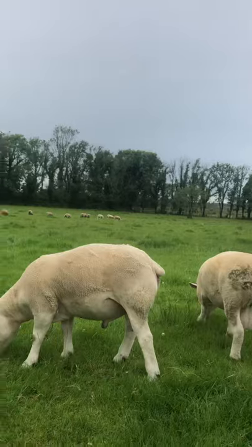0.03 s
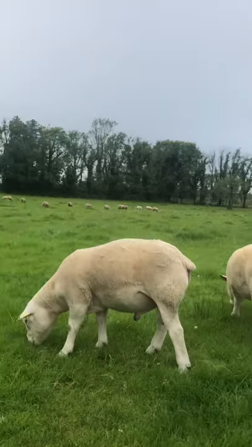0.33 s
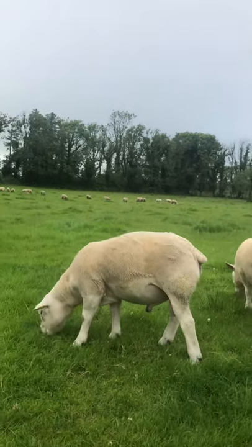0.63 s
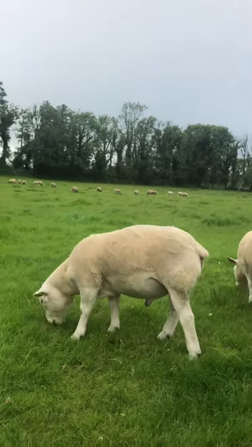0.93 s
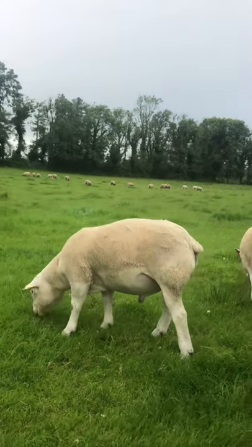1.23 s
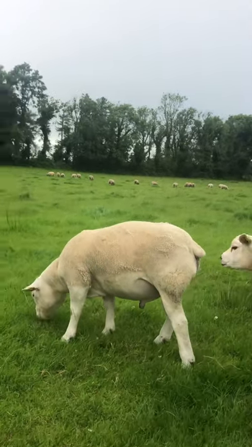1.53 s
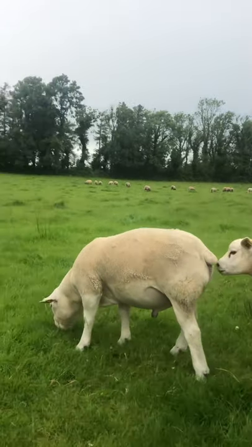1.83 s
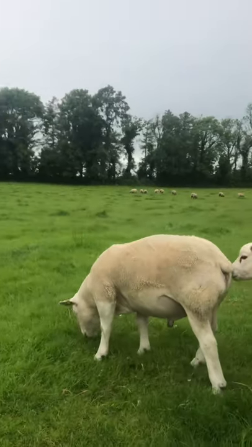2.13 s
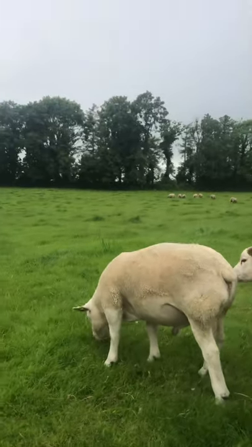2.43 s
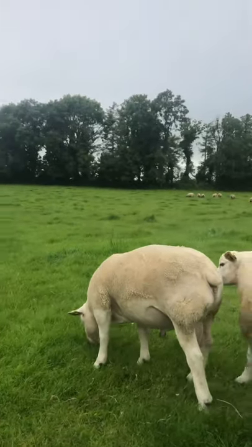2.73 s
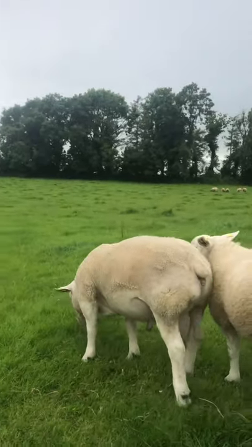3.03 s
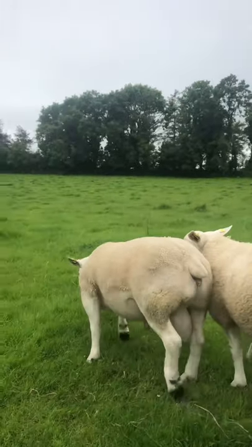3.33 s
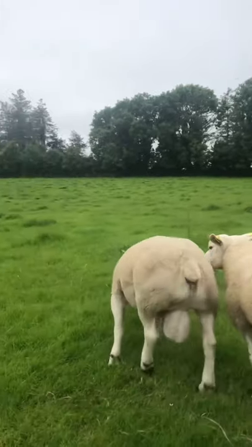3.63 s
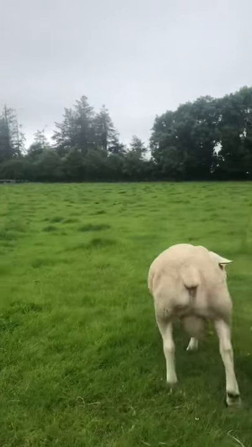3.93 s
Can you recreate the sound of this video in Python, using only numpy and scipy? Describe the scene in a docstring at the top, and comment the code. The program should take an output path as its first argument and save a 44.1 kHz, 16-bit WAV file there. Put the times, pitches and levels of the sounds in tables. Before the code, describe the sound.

Quiet rustling and crisp little snaps come from nearby sheep pulling at long grass in a field. A low wind rumble on the microphone grows into uneven, muffled gusts that are louder than the grazing near the end.

```python
"""Sheep graze a few steps away in an open field. From the start long grass swishes over distant air
and a faint hum, and a light breeze rumbles on the microphone. Stalks snap and tufts tear as the sheep
pull at them; after a second, sliding blades hiss now and then and a few hard little clicks sound.
From about two seconds on the breeze freshens, and its turbulence hits the microphone in short, dull
buffets and tight eddies while the grazing goes on."""
import sys
import numpy as np
from scipy import signal
from scipy.io import wavfile

SR = 44100
rng = np.random.default_rng(int(sys.argv[2]) if len(sys.argv) > 2 else 0)


def inscribe(sig):
    """Save sig as 16-bit PCM at rate SR to the path in sys.argv[1].

    A 1-D sig is mono; a 2-D sig holds one channel per row.
    Samples are clipped to [-1, 1] before scaling.
    """
    pcm = np.round(np.clip(np.atleast_2d(sig).T, -1, 1) * 32767)
    wavfile.write(sys.argv[1], SR, pcm.astype(np.int16))


N = 176400
TIME = np.arange(N) / SR


def from_db(db):
    """Amplitude ratio of a level in decibels."""
    return 10 ** (np.asarray(db) / 20)


def unit_rms(x):
    """Normalisation to a mean square of one."""
    return x / np.sqrt(np.mean(x ** 2) + 1e-20)


def in_time(rows):
    """Linear interpolation of (time, value) rows at every sample."""
    return np.interp(TIME, *np.transpose(rows))


def filtered(x, hz, kind, order=2):
    """Butterworth filter: maximally flat in its passband."""
    sos = signal.butter(order, np.clip(hz, 10, .45 * SR), kind, fs=SR, output="sos")
    return signal.sosfilt(sos, x + 1e-18)


def drift(per_s):
    """Random fluctuation: straight lines between Gaussian values of unit variance."""
    knots = rng.standard_normal(600)
    return np.interp(TIME * per_s, np.arange(len(knots)), knots)


def grains(per_s, spread_db, size):
    """Shot noise: impulses of random time, sign and strength."""
    strength = from_db(spread_db * np.minimum(rng.exponential(1, size), 5))
    return (rng.random(size) < per_s / SR) * strength * rng.choice([-1, 1], size)


def coloured(sources, spectrum, tilt_db=0, patchy_db=0):
    """Spectral shaping in half-octave bands, taken in turn from two sources; unit rms."""
    edges = 30 * 2 ** np.arange(0, 9.6, .5)
    points_hz, levels = np.transpose(spectrum)
    out = 0
    for k, (low, high) in enumerate(zip(edges, edges[1:])):
        if high < points_hz[0]:
            continue
        hz = np.sqrt(low * high)
        db = np.interp(np.log(hz), np.log(points_hz), levels) + tilt_db * np.log2(hz)
        if patchy_db:
            db = db + patchy_db * drift(16)
        out = out + from_db(db) * filtered(sources[k % 2], [low, high], "band")
    return unit_rms(out)


def burst(x, length_s, edge_s):
    """Gating with raised-cosine edges; unit rms over the length."""
    t = TIME[:len(x)]
    ramp = np.clip(np.minimum(t, length_s + edge_s - t) / edge_s, 0, 1)
    x = x * np.sin(np.pi / 2 * ramp) ** 2
    return x / np.sqrt(np.sum(x ** 2) / (length_s * SR) + 1e-20)


def add(out, start_s, x):
    """Superposition of x on out from a given time."""
    i = int(np.clip(start_s * SR, 0, N - 1))
    out[i:i + len(x)] += x[:N - i]


# Spectrum of distant air: (frequency [Hz], relative spectral level [dB])
AIR_SPECTRUM = [(30, 13.5), (70, -2.5), (190, 0.5), (300, -9.5), (500, -2), (1000, -8), (2000, -20),
                (4000, -30), (9000, -42.5), (16000, -58)]
# Envelope of a far hum: (time [s], level [dB])
HUM_LEVEL = [(0, -67.5), (.45, -69), (.65, -63.5), (1.25, -67), (1.6, -88), (4, -68)]


def field():
    """Ambient noise of distant air, with a faint hum broadened by random frequency modulation."""
    air = from_db(-64) * coloured(rng.standard_normal((2, N)), AIR_SPECTRUM)
    hum_hz = 198.6 + 5 * drift(20)
    hum = np.sqrt(2) * np.sin(2 * np.pi * np.cumsum(hum_hz) / SR)
    return air + from_db(in_time(HUM_LEVEL)) * hum


# Spectra of the grass's body and tips: (frequency [Hz], relative spectral level [dB])
BODY_SPECTRUM = [(300, 8), (700, 4.5), (1200, 3), (2200, -1.5), (4000, -1.5), (6000, -4), (9000, -4.5),
                 (16000, -50)]
TIP_SPECTRUM = [(4000, -3.5), (6000, -0.5), (8500, -2), (11500, 10), (16000, -5)]
# Envelopes of the body, the tips and the tips' highest treble: (time [s], relative level [dB])
BODY_LEVEL = [(0, -62.5), (.1, -61), (.25, -64.5), (.47, -66.5), (.52, -57), (.75, -62), (.82, -60),
              (1.05, -57), (1.15, -63), (1.24, -60), (1.58, -66), (1.88, -61), (2.15, -66.5), (2.54, -62.5),
              (2.63, -61.5), (2.72, -63), (2.84, -61), (2.92, -65), (3.3, -63), (3.35, -62), (3.64, -59.5),
              (3.76, -64), (4, -68)]
TIP_LEVEL = [(0, -63.5), (.1, -56), (.2, -58), (.47, -71.5), (.51, -61), (.62, -61.5), (.68, -55),
             (.76, -59.5), (.81, -56.5), (1.17, -62.5), (1.23, -55), (1.29, -62), (1.35, -54.5), (1.4, -68),
             (1.68, -63), (1.95, -60), (2.2, -73), (2.5, -64), (2.63, -63), (2.72, -63.5), (2.87, -62),
             (2.91, -70), (3.09, -74), (3.31, -64.5), (3.34, -54.5), (3.4, -58), (3.66, -59.5), (3.87, -67),
             (3.93, -61.5), (4, -65)]
SHEEN_LEVEL = [(0, -4), (.9, -2.5), (1.7, -4.5), (2.5, -1), (4, -2.5)]


def swish(sheen_hz=11100):
    """Countless blade contacts sum incoherently into a papery body and a fine hiss from the tips."""
    def brushing(spectrum):
        contacts = [grains(per_s=20000, spread_db=3, size=N) for _ in range(2)]
        return coloured(contacts, spectrum, patchy_db=1.62)

    body = from_db(in_time(BODY_LEVEL) + 1.5) * brushing(BODY_SPECTRUM)
    hiss = brushing(TIP_SPECTRUM)
    sheen = from_db(in_time(SHEEN_LEVEL)) * filtered(hiss, sheen_hz, "high", order=5)
    tips = from_db(in_time(TIP_LEVEL) - .5) * (filtered(hiss, sheen_hz, "low", order=5) + sheen)
    flutter = from_db(0.44 * drift(18))
    return flutter * (body + tips)


# Envelope of the breeze between buffets: (time [s], level [dB])
BREEZE_LEVEL = [(0, -64.5), (1.05, -65.5), (1.6, -64), (2.15, -59.5), (2.3, -54.5), (2.64, -54.5),
                (2.71, -46.5), (2.95, -48), (3.06, -39.5), (3.38, -45.5), (3.55, -50.5), (3.7, -48.5),
                (3.78, -38), (3.9, -38.5), (4, -39.5)]


def breeze(low_hz=70.4, octaves_per_db=0.1751, widen_above_db=-44.5):
    """Turbulent pressure at the microphone: stronger flow is louder and reaches higher frequencies."""
    db = in_time(BREEZE_LEVEL) + 2.5 * drift(70)
    edge_hz = 134.6 * 2 ** (octaves_per_db * np.maximum(db - widen_above_db, 0))
    bands = np.geomspace(25, 1600, 13)
    out, power = 0, 0
    for low, high in zip(bands, bands[1:]):
        hz = np.sqrt(low * high)
        treble_loss = (1 + (hz / edge_hz) ** 3) * (1 + (hz / edge_hz / 1.63) ** 10)
        bass_loss = 1 + (low_hz / hz) ** 7
        gain = 1 / np.sqrt(treble_loss * bass_loss)
        out = out + gain * unit_rms(filtered(rng.standard_normal(N), [low, high], "band", order=3))
        power = power + gain ** 2
    return out / np.sqrt(power) * from_db(db)


# Stalks breaking: (time [s], peak level [dB])
STALK_SNAPS = [(.017, -42.5), (.417, -41.5), (.641, -33), (0.645, -36), (.669, -43), (0.6982, -37),
               (0.75, -37), (.7878, -31), (0.793, -41), (0.809, -40), (.870, -32.5), (1.513, -36.5),
               (1.628, -38.5), (1.9825, -40), (2.084, -34), (3.325, -39)]


def snaps(decay_s=0.0013):
    """Brittle fracture: a stalk gives one impulse, then splintering that decays exponentially."""
    out, t = np.zeros(N), TIME[:SR // 20]
    for start_s, db in STALK_SNAPS:
        impulse = t == 0
        splinters = from_db(-11.5) * (t > 0) * rng.standard_normal(len(t)) * np.exp(-t / decay_s)
        crack = filtered(impulse + splinters, [1200, 15500], "band", order=1)
        add(out, start_s, from_db(db) * crack / np.abs(crack).max())
    return out


# Buffets of wind: (start [s], duration [s], level [dB], upper cutoff [Hz])
WIND_BUFFETS = [(.027, 0.055, -58, 112), (0.233, .067, -56.5, 195), (.99, 0.1, -56, 176),
                (1.355, 0.076, -49.5, 211), (1.742, 0.012, -51.5, 376), (2.201, 0.085, -47.5, 150),
                (2.293, 0.024, -40.5, 186), (2.348, 0.017, -43, 201), (2.462, .016, -32.5, 172),
                (2.484, .075, -41.5, 210), (2.827, 0.024, -33, 106), (2.976, 0.039, -33, 190),
                (3.028, 0.028, -28.5, 199), (3.066, 0.061, -36, 240), (3.144, .08, -36, 247),
                (3.267, 0.0124, -33.5, 330), (3.325, 0.019, -37.5, 218), (3.63, 0.034, -41.5, 337),
                (3.744, 0.033, -28.5, 270), (3.8, 0.018, -27.5, 566), (3.833, 0.02, -43, 606),
                (3.898, 0.046, -32, 402), (3.974, .022, -30, 134)]


def buffets(edge_s=0.0052):
    """A passing eddy is a short, band-limited pressure fluctuation; large, slow ones reach deeper."""
    out = np.zeros(N)
    for start_s, length_s, db, cutoff_hz in WIND_BUFFETS:
        pressure = filtered(rng.standard_normal(SR // 2), min(100, 0.59 * cutoff_hz), "high", order=3)
        pressure = filtered(pressure, 0.25 * cutoff_hz, "low", order=1)
        pressure = filtered(pressure, cutoff_hz, "low", order=6)
        settled = pressure[len(pressure) // 2:]
        add(out, start_s - edge_s / 2, from_db(db) * burst(settled, length_s, edge_s))
    return out


# Tufts tearing: (start [s], duration [s], level [dB], spectral tilt [dB/octave])
TUFT_TEARS = [(0.061, 0.075, -58, -0.5), (0.171, 0.018, -55, -2), (0.618, 0.11, -53.5, -4.5),
              (0.791, 0.022, -51.5, -4.5), (1.911, 0.088, -54, -3), (2.061, .02, -51.5, -4),
              (2.598, 0.059, -56, -4), (2.782, 0.047, -57.5, -4.5), (2.824, 0.07, -53.5, -3),
              (3.595, 0.075, -58.5, -5.5)]
# Spectrum of breaking fibres before the tilt: (frequency [Hz], relative spectral level [dB])
FIBRE_SPECTRUM = [(200, -8.5), (500, 2), (1000, 2), (2000, -5), (4000, 0), (9000, 1), (16000, -0.5)]


def tears(edge_s=.006, size=8000):
    """Cascading fracture: a dense run of fine fibres swells and ebbs as thicker blades crackle."""
    out = np.zeros(N)
    for start_s, length_s, db, tilt_db in TUFT_TEARS:
        fibre_breaks = [grains(per_s=3500, spread_db=4, size=size) for _ in range(2)]
        fibres = coloured(fibre_breaks, FIBRE_SPECTRUM, tilt_db)
        blade_breaks = grains(per_s=300, spread_db=3, size=size)
        blades = from_db(-5) * unit_rms(filtered(blade_breaks, [1500, 10000], "band", order=1))
        swell = from_db(5.5 * np.sin(np.pi * np.minimum(TIME[:size] / length_s, 1)))
        add(out, start_s - edge_s / 2, from_db(db) * burst(swell * (fibres + blades), length_s, edge_s))
    return out


# Blades sliding: (start [s], duration [s], level [dB], start frequency [Hz], end frequency [Hz])
BLADE_SLIDES = [(1.281, 0.12, -64.5, 10550, 11600), (1.62, 0.18, -68, 14700, 13000),
                (2.3, .41, -68, 8970, 15100), (3.097, .23, -67.5, 14100, 11850)]


def slides(half_width_hz=1600):
    """Sliding friction between blades: narrow-band noise that swells as its centre frequency glides."""
    out = np.zeros(N)
    for start_s, length_s, db, start_hz, end_hz in BLADE_SLIDES:
        hz = np.linspace(start_hz, end_hz, int(length_s * SR))
        in_phase, quadrature = filtered(rng.standard_normal((2, SR)), half_width_hz, "low")[:, :len(hz)]
        phase = 2 * np.pi * np.cumsum(hz) / SR
        hiss = in_phase * np.cos(phase) + quadrature * np.sin(phase)
        swell = np.sqrt(np.hanning(len(hz)))
        add(out, start_s, from_db(db) * unit_rms(swell * hiss))
    return out


# Hard little contacts: (time [s], gain [dB], upper cutoff [Hz])
HARD_CLICKS = [(1.305, -38, 2010), (1.408, -42, 3200), (2.2693, -29, 5140), (2.993, -38, 2940),
               (3.055, -29.5, 2030)]
# Modes of a contact: (frequency [Hz], relative level [dB], time to decay by 60 dB [s])
CONTACT_MODES = [(1350, 4.5, 0.0013), (2030, -4, 0.006), (3580, -0.5, 0.0037), (5830, -11.5, 0.0066)]


def clicks(rebound_s=0.00258, rebound_db=-14.5):
    """Impact excitation: a hard contact rings in heavily damped modes and rebounds once."""
    out, t = np.zeros(N), TIME[:SR // 20]
    ring = sum((-1) ** k * from_db(db - 60 * t / t60) * np.sin(2 * np.pi * hz * t)
               for k, (hz, db, t60) in enumerate(CONTACT_MODES))
    ring = filtered(ring, 1150, "high")
    for start_s, db, cutoff_hz in HARD_CLICKS:
        click = from_db(db) * filtered(ring, cutoff_hz, "low", order=3)
        add(out, start_s, click)
        add(out, start_s + rebound_s, from_db(rebound_db) * click)
    return out


# Tight eddies: (start [s], peak level [dB], nominal start frequency [Hz])
TIGHT_EDDIES = [(2.464, -31.5, 510), (3.0232, -22, 807), (3.034, -27.5, 956), (3.043, -24.5, 792),
                (3.053, -32, 595), (3.171, -36.5, 710), (3.239, -37, 520), (3.0, -31, 600),
                (3.781, -23.5, 883), (3.804, -28.5, 996), (3.903, -28.5, 774), (3.927, -25.5, 864),
                (3.965, -30.5, 770)]


def eddies(rise_s=0.0057, glide_s=0.00426, end_hz=109, wobble_octaves=0.21):
    """A tight eddy slaps the microphone and spreads: its pressure ripple is a fast downward chirp."""
    out, t = np.zeros(N), TIME[:SR // 20]
    envelope = (t / rise_s * np.exp(1 - t / rise_s)) ** 2
    for start_s, db, start_hz in TIGHT_EDDIES:
        glide_hz = end_hz + (start_hz - end_hz) * np.exp(-t / glide_s)
        wobble = 2 ** (wobble_octaves * drift(540)[:len(t)])
        phase = 2 * np.pi * (np.cumsum(glide_hz * wobble) / SR + rng.random())
        add(out, start_s, from_db(db) * envelope * np.sin(phase))
    return out


def scene():
    """Linear superposition of field, grass and wind at one microphone."""
    continuous = field() + swish() + breeze()
    return (continuous + snaps() + buffets() + tears() + slides() + clicks() + eddies())[None]


def record(dry):
    """Band limiting: the microphone sheds the deepest bass, and the top is cut steeply."""
    dry = filtered(dry, 45.2, "high", order=4)
    return signal.sosfilt(signal.ellip(12, .1, 70, 15700, fs=SR, output="sos"), dry)


dry = scene()
out = record(dry)
inscribe(out)
```